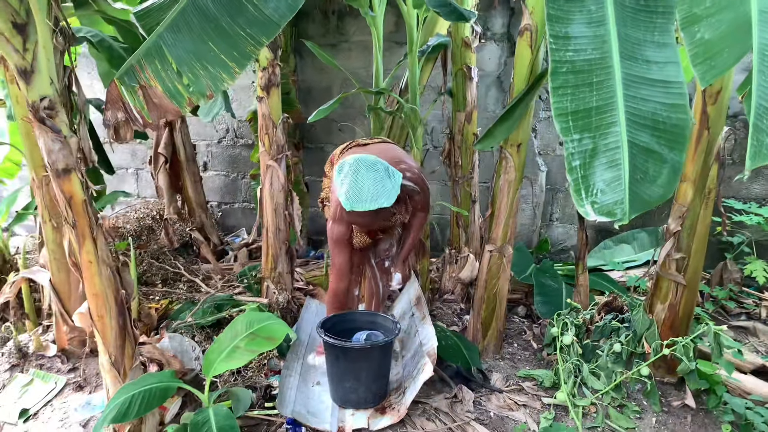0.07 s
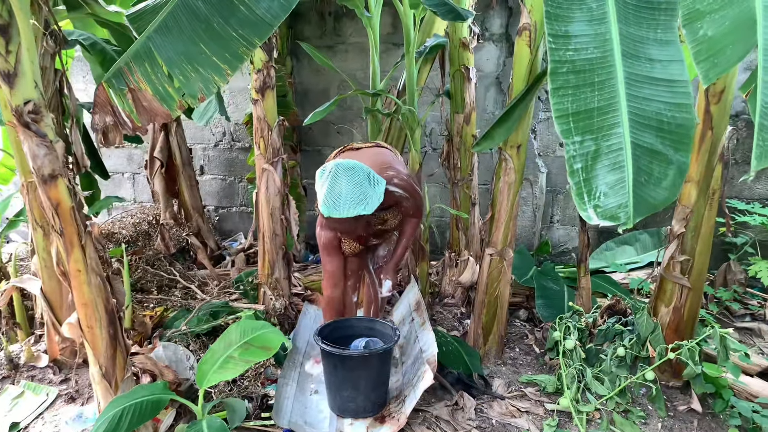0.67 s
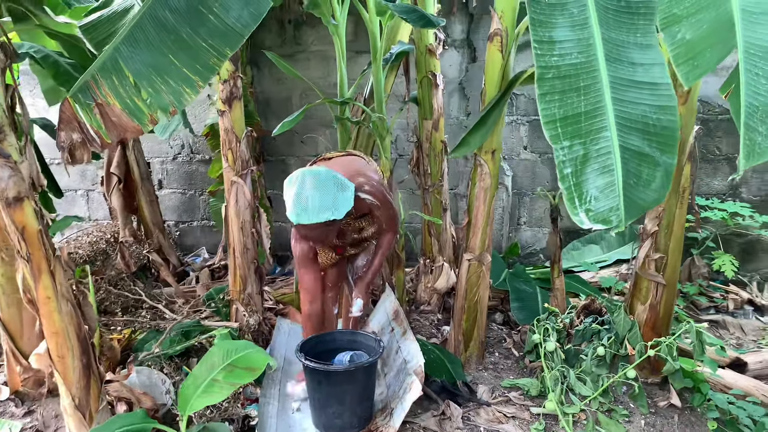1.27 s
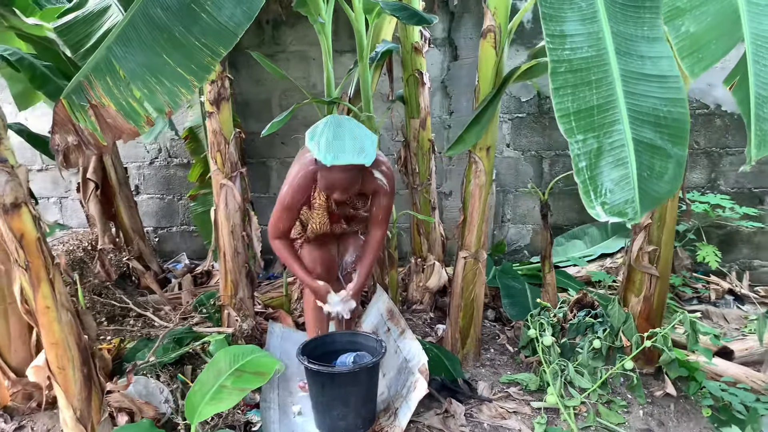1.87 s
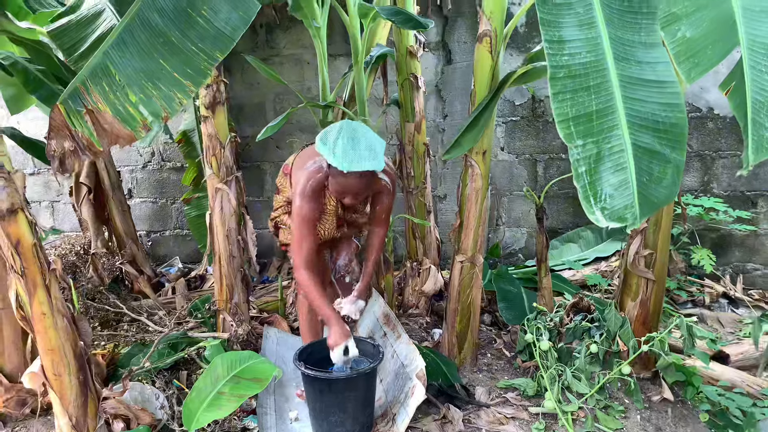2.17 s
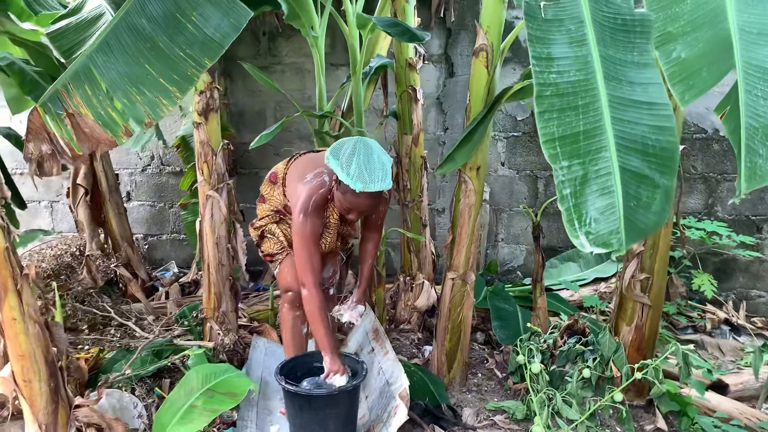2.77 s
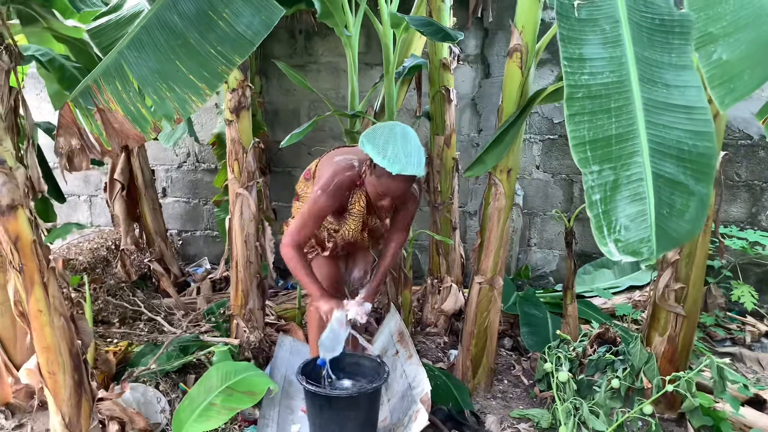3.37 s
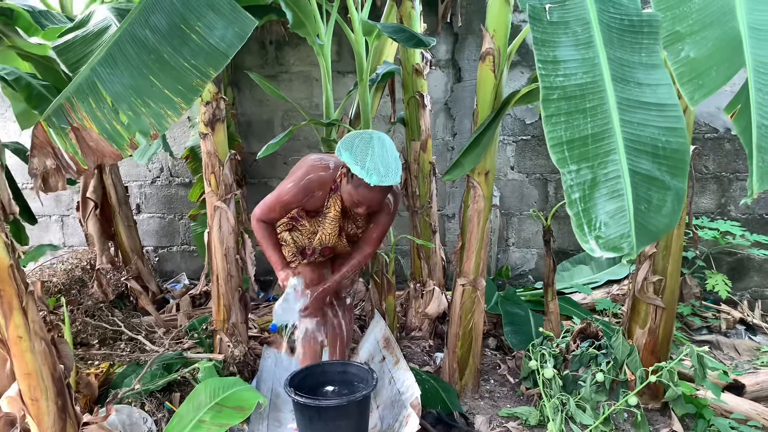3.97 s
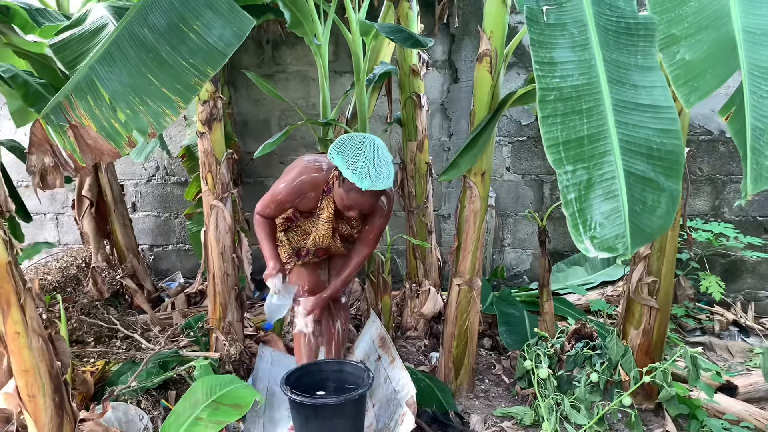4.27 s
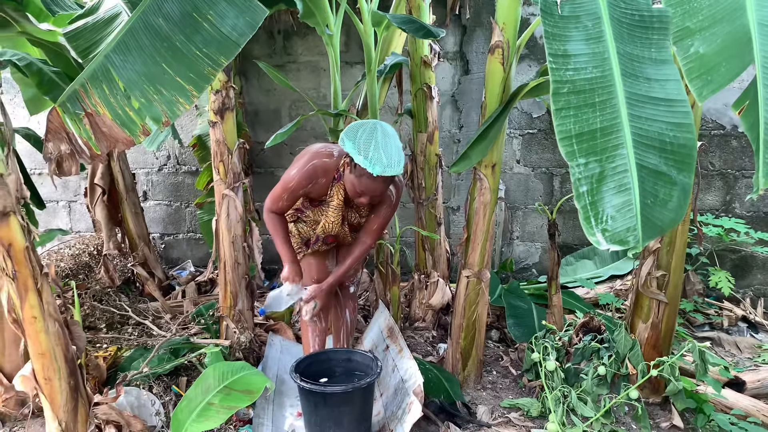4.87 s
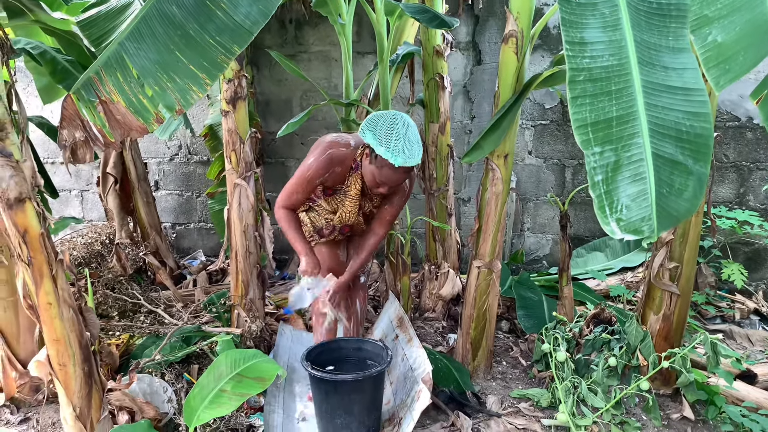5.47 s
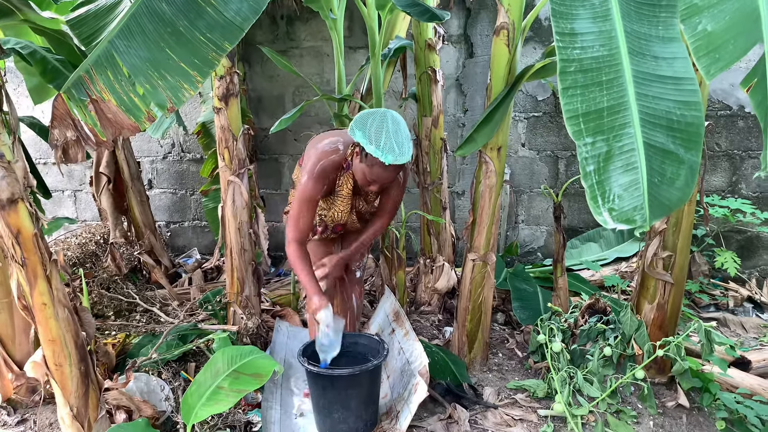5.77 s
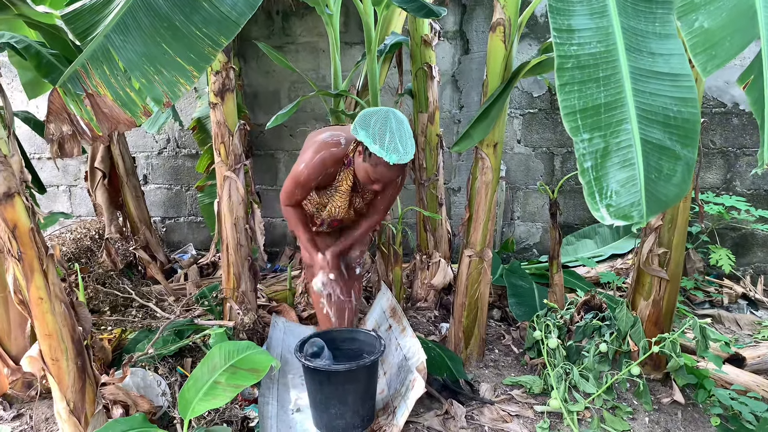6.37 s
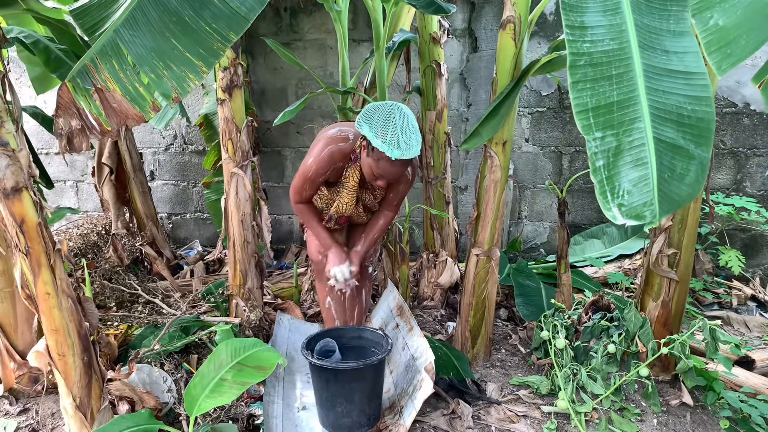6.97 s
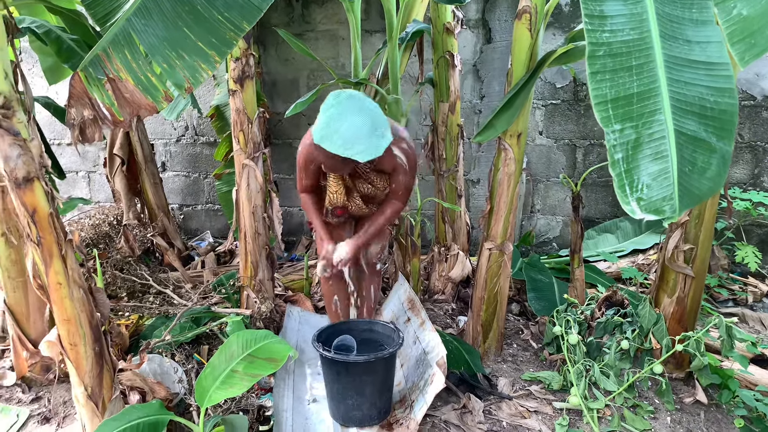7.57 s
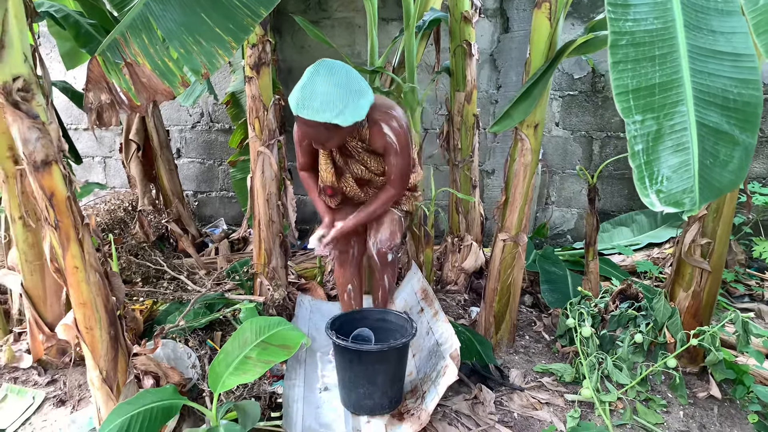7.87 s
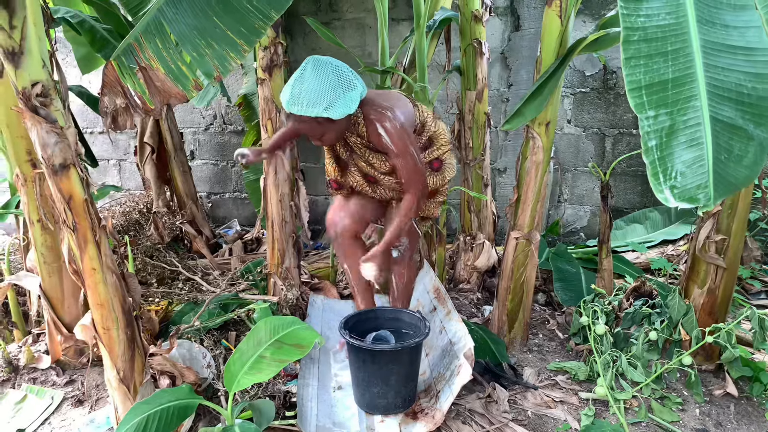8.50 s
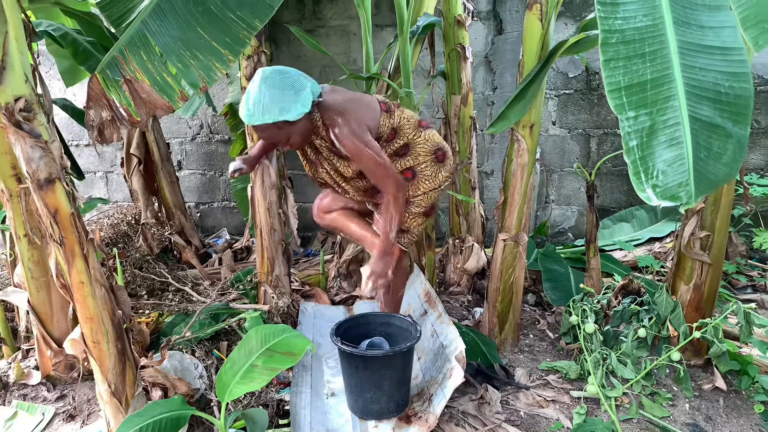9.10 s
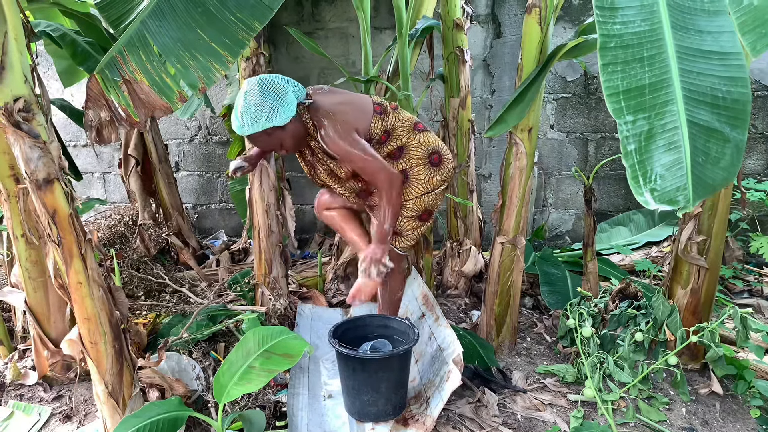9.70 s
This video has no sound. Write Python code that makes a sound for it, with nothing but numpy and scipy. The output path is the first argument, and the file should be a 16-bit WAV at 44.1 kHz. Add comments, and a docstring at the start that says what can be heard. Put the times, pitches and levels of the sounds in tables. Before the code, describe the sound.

Someone washes in a walled garden. A wet sponge rubs and squelches softly over skin with fizzing lather. Water plops in a plastic bucket, then splats and patters on a thin metal sheet underfoot. A cup knocks in the bucket. The sheet buckles with short ringing clanks, which come thickest near the end among wet smacks. The outdoor air is faint, with only a short echo.

```python
"""A wet sponge rubs and squelches over skin, its lather fizzing with each stroke, in faint outdoor air.
Someone is washing in a walled garden, standing on a thin metal sheet that grumbles, buckles and rings
under the shifting feet. Scooped water splats down and drums on the metal, a cup and drips knock and
plop at a plastic bucket, bubbles gulp, short clear tones chirp, and wet hollows smack shut.
The wall and plants give everything a short tail."""
import sys
import numpy as np
from scipy import signal
from scipy.fft import rfft, irfft, next_fast_len
from scipy.io import wavfile

SR = 44100
rng = np.random.default_rng(int(sys.argv[2]) if len(sys.argv) > 2 else 0)


def waveform_to_disk(signal):
    """Save audio, clipped to [-1, 1], as 16-bit WAV at the path in sys.argv[1]."""
    frames = np.transpose(np.atleast_2d(signal))
    scaled = np.clip(frames, -1, 1) * 32767
    samples = np.round(scaled).astype(np.int16)
    wavfile.write(sys.argv[1], SR, samples)


N = 429534
T = np.arange(N) / SR
HIT_T = T[:SR * 3 // 5]  # time axis of a one-shot

# water runs from the cup or the squeezed sponge: t/s, length/s, flow/dB, foam/dB, drumming/dB
POURS = [(3.52, 0.2, -70, -63, -62), (4.055, 0.33, -57.5, -45.5, -50), (5.49, 0.26, -61.5, -55, -55.5),
         (5.63, 0.047, -54, -45, -51), (7.35, 0.39, -61.5, -61, -64), (7.62, 0.26, -61.5, -57, -59),
         (7.93, 0.27, -62.5, -63.5, -62.5), (8.33, 0.07, -58, -57.5, -49.5)]


def undb(db):
    """Decibels to gain."""
    return 10 ** (np.asarray(db) / 20)


def unit(x):
    """Scale to an rms of one."""
    return x / np.sqrt(np.mean(x ** 2) + 1e-24)


def unit_energy(x):
    """Scale to an energy of one."""
    return x / np.sqrt(np.sum(x ** 2) + 1e-24)


def at(points, hz):
    """Read (f/Hz, value) points on a log-frequency axis."""
    f, v = np.transpose(points)
    return np.interp(np.log(np.maximum(hz, 1)), np.log(f), v)


def colour(x, points, size=4096):
    """Minimum-phase EQ through (f/Hz, level/dB) points."""
    cepstrum = irfft(np.log(undb(at(points, np.fft.rfftfreq(size, 1 / SR)))))
    cepstrum[1:size // 2] *= 2
    cepstrum[size // 2 + 1:] = 0
    response = irfft(np.exp(rfft(cepstrum)))
    return signal.fftconvolve(x, response)[:len(x)]


def bands(x, count=18):
    """Split a sound into overlapping log-spaced bands, each with its centre in Hz."""
    centres = np.geomspace(40, 16000, count)
    size = next_fast_len(len(x))
    spectrum, f = rfft(x, size), np.fft.rfftfreq(size, 1 / SR)
    for hz, share in zip(centres, np.eye(count)):
        yield hz, irfft(spectrum * at(np.c_[centres, share], f), size)[:len(x)]


def drift(rate):
    """Random modulation with a spread near one and `rate` turning points a second."""
    knots = rng.standard_normal(1000)
    return np.interp(T * rate, np.arange(len(knots)), knots)


def flicker(x, depth_db, rate):
    """Narrow bands swell and sink on their own, so that resonances come and go."""
    return unit(sum(band * undb(depth_db * drift(rate)) for _, band in bands(x, count=36)))


def add(out, s, sound):
    """Mix a sound in at time s."""
    start = max(int(s * SR), 0)
    part = sound[:max(N - start, 0)]
    out[start:start + len(part)] += part


def fade(t60):
    """Exponential decay that loses 60 dB in t60 seconds."""
    return np.exp(-np.log(1000) * HIT_T / t60)


def rise(seconds):
    """Exponential attack with the given time constant."""
    return 1 - np.exp(-HIT_T / seconds)


def ring(modes):
    """Decaying sines (f/Hz, level/dB, t60/s), a little different at every point of contact."""
    chance = rng.standard_normal((len(modes), 3)) * [2.5, .008, 1]
    out = np.zeros(len(HIT_T))
    for (hz, db, t60), (louder, detune, polarity) in zip(modes, chance):
        tone = np.sign(polarity) * np.sin(2 * np.pi * hz * (1 + detune) * HIT_T)
        out += undb(db + louder) * tone * fade(t60)
    return out


def tail(t60s, build_cycles=0.43):
    """Dense decay of unit energy from (f/Hz, t60/s) points; the lows build up late."""
    noise = rng.standard_normal(len(HIT_T))
    decays = (band * fade(at(t60s, hz)) * rise(build_cycles / hz) for hz, band in bands(noise))
    return unit_energy(sum(decays))


def level_hit(x, db, band_hz, size=1024):
    """Set the level of a hit's first samples within a band."""
    onset = signal.sosfilt(signal.butter(2, band_hz, "band", fs=SR, output="sos"), x[:size])
    return x * undb(db) / np.sqrt(np.mean(onset ** 2))


def grains(size, rate, scatter_db):
    """A stream of tiny bursts, most weak and a few strong."""
    gains = undb(scatter_db * np.minimum(rng.exponential(size=size), 5))
    return unit((rng.random(size) < rate / SR) * gains * rng.standard_normal(size))


def cavity(hz, width_hz):
    """Turbulence held in a cavity whose pitch may move."""
    pole = np.exp(-np.pi * width_hz / SR)
    noise = rng.standard_normal(len(hz)) + 1j * rng.standard_normal(len(hz))
    slow = signal.lfilter([1], np.poly([pole, pole]), noise)
    return unit(np.real(slow * np.exp(2j * np.pi * np.cumsum(hz) / SR)))


def swell(s, length, skew=0.03, steepness=1.84):
    """A bell around time s, as of a hand that speeds up and then slows a little more gently."""
    away = (T - s) / (length / 2)
    reach = np.abs(away) * (1 - skew * np.sign(away))
    return np.exp(-np.minimum(reach, 10) ** steepness)


def flow(s, length, attack_s=0.0029, release_s=0.084, sag_db_per_s=15.5):
    """Water starts quickly, weakens as the sponge or cup empties and dribbles out."""
    age = np.maximum(T - s, 0)
    attack = np.minimum(age / attack_s, 1)
    release = np.exp(-np.clip((age - length) / release_s, 0, 20))
    return attack * undb(-sag_db_per_s * age) * release


def envelope(rows, shape, db_column):
    """Power sum of gestures (t/s, length/s, ...), each at the level in one column."""
    return np.sqrt(sum((undb(row[db_column]) * shape(row[0], row[1])) ** 2 for row in rows))


def washing(rest_db, db_column):
    """Envelope of a wet sound that strokes and pours both feed, over its resting level."""
    # the sponge passes over the skin: mid-stroke t/s, length/s, rub/dB, foam/dB
    strokes = [(.03, 0.22, -68, -81), (.467, 0.19, -58, -54), (.585, 0.063, -69, -60.5),
               (.73, 0.38, -68, -68), (.83, 0.036, -70, -58), (1.058, 0.037, -68, -53.5),
               (1.16, 0.35, -73.5, -86), (1.315, 0.077, -63, -72), (1.533, 0.04, -92, -57),
               (2.27, 0.22, -60, -71), (2.92, 0.043, -69, -67), (3.15, 0.17, -70.5, -70),
               (3.34, 0.055, -65.5, -61), (3.72, 0.025, -59, -46.5), (3.97, 0.17, -61, -67.5),
               (5.4, 1, -72.5, -75.5), (6.35, 0.34, -67.5, -74), (6.69, 0.11, -63.5, -64.5),
               (6.87, 0.06, -69, -65), (7.24, 1, -69.5, -75.5), (8.97, 0.48, -68, -86.5),
               (9.16, 0.062, -61.5, -66.5), (9.23, 0.078, -61.5, -69), (9.44, 0.24, -71, -82),
               (9.735, 0.023, -53.5, -63)]
    stroking, pouring = envelope(strokes, swell, db_column), envelope(POURS, flow, db_column)
    return np.sqrt(stroking ** 2 + pouring ** 2 + undb(rest_db) ** 2)


def air(drone_db=-70.5, rumble_rest_db=-71):
    """The outdoor bed: a far, wavering drone over a low rumble that swells now and then."""
    # spectrum of the far drone: f/Hz, level/dB
    drone_eq = [(60, -6.5), (140, -4), (250, 0.5), (450, -6.5), (750, -12.5), (1500, -22), (4000, -35.5)]
    # spectrum of the rumble: f/Hz, level/dB
    rumble_eq = [(18, -25.5), (35, -6), (58, 0), (95, -2), (160, -9), (400, -37)]
    # the rumble swells: peak t/s, length/s, level/dB
    swells = [(.09, 0.22, -61.5), (2.8, 0.53, -82.5), (3.38, 0.45, -59), (3.66, 0.26, -60),
              (5.87, 0.15, -52), (8.78, 0.37, -54)]
    drone = flicker(colour(rng.standard_normal(N), drone_eq), depth_db=4, rate=10)
    rumble = unit(colour(rng.standard_normal(N), rumble_eq))
    heave = np.hypot(undb(rumble_rest_db), envelope(swells, swell, db_column=2))
    return drone * undb(drone_db) + rumble * heave


def rubbing(gain_db=4.0, grip_db=1.8, pocket_hz=1900, pocket_db=-10):
    """The sponge grips and slips on wet skin; the hollow under the hand changes size and pitch."""
    # spectrum of sponge on skin: f/Hz, level/dB
    rub_eq = [(200, -13.5), (600, -1.5), (1200, 3.5), (2200, 3.5), (4000, 6), (7000, -6.5), (9500, -4.5),
              (14000, -36)]
    slips = grains(N, rate=2200, scatter_db=3.4) + .4 * rng.standard_normal(N)
    friction = flicker(colour(slips, rub_eq), depth_db=3, rate=24)
    pocket = cavity(pocket_hz * 2 ** (.6 * drift(11)), width_hz=900)
    grip = undb(gain_db + grip_db * drift(35))
    return (friction + undb(pocket_db) * pocket) * washing(rest_db=-80, db_column=2) * grip


def foam(gain_db=0.15):
    """Foam cells and fine droplets burst in uneven clusters over a thin hiss."""
    # spectrum of the fizz: f/Hz, level/dB
    fizz_eq = [(5000, -17.5), (8500, -10.5), (11000, -11), (13500, -17), (16000, -21.5)]
    pops = grains(N, rate=2000, scatter_db=3.2) + .35 * rng.standard_normal(N)
    clusters = undb(2.2 * drift(70))
    fizz = unit(colour(pops * clusters, fizz_eq))
    return fizz * washing(rest_db=-86, db_column=3) * undb(gain_db)


def squelches():
    """A wet pocket opens or closes, so its resonance glides while it swells and fades."""
    # air and water gurgle through the sponge: t/s, length/s, level/dB, start f/Hz, end f/Hz
    gurgles = [(0.304, 0.06, -56, 430, 370), (0.524, 0.19, -65, 611, 540), (1.052, 0.11, -63.5, 740, 656),
               (2.274, 0.158, -53, 567, 489), (2.88, 0.22, -65.5, 820, 600),
               (3.472, 0.092, -59.5, 600, 530)]
    out = np.zeros(N)
    for s, length, db, first_hz, last_hz in gurgles:
        progress = np.minimum(HIT_T / length, 1)
        hz = first_hz * (last_hz / first_hz) ** progress
        add(out, s, cavity(hz, width_hz=220) * np.sin(np.pi * progress) * undb(db))
    return out


def drumming():
    """The sheet answers shifting weight and falling water with a dull, hollow patter."""
    # the weight shifts on the sheet: peak t/s, length/s, level/dB
    grumbles = [(.82, 0.8, -75), (2.95, 0.24, -61.5), (3.45, 0.29, -67), (5.36, 1, -60.5),
                (6.74, 0.36, -66), (7.3, 0.39, -62), (8.93, 0.33, -63.5), (9.7, 0.11, -59)]
    # dull spectrum of the sheet: f/Hz, level/dB
    hollow_eq = [(60, -17.5), (140, 1), (250, 2.5), (450, -3.5), (750, -3), (1500, -19.5), (4000, -48)]
    taps = grains(N, rate=900, scatter_db=2.5)
    patter = flicker(colour(taps, hollow_eq), depth_db=5, rate=18)
    return patter * np.hypot(envelope(POURS, flow, db_column=4), envelope(grumbles, swell, db_column=2))


def buckling(ring_db=-1.0, modes_db=-12, patch_db=-11, patch_t60=0.054, lead_in_db=-15):
    """A tick and a crack ring the buckling patch and the whole sheet; less snap is slower and duller."""
    # the sheet buckles under a foot: t/s, body/dB, thump/dB, snap/dB, patch f/Hz
    buckles = [(2.096, -38.5, -3.5, -20, 530), (2.529, -43.5, -6, -6, 607), (2.597, -54, -8.5, -51, 960),
               (3.798, -38.5, -25, -12, 1016), (5.034, -42, 6, -51, 314), (5.118, -32.5, -2, -10.5, 810),
               (5.149, -29, -6, -8.5, 456), (5.167, -30.5, -36.5, -9.5, 1120), (6.367, -56, 11, -3, 407),
               (6.398, -44.5, -10.5, -25, 918), (6.549, -35, -7, -24.5, 1004), (6.655, -39, -2, -32, 501),
               (7.377, -36, -9, -5, 1027), (7.656, -36, -1.5, -8.5, 2040), (7.711, -30, -10, -9.5, 1536),
               (7.798, -42, 2, -52, 430), (7.984, -33, -2, -11, 910), (8.139, -30.5, -8, -13, 933),
               (8.175, -27.5, -4, -1.5, 1840), (8.274, -43.5, 3.5, -34.5, 655),
               (8.376, -42, -6, -19.5, 914), (8.416, -36.5, -0.5, -2.5, 1206), (8.46, -41, -9, -36.5, 642),
               (8.481, -36.5, -3, -22, 315), (8.516, -47, 10.5, -33, 338), (8.554, -26, -11, -1.6, 1180),
               (8.661, -52.5, 5.5, -18, 360), (8.723, -20.5, -13, -0.8, 1540)]
    # modes of the sheet, damped by feet and soil: f/Hz, level/dB, t60/s
    sheet_modes = [(95, -8, 0.5), (271.1, -6, 0.29), (342, -3, 0.49), (471.7, -11, 0.41), (613, -3, 0.26),
                   (744, -0.5, 0.19), (1086, 5.5, 0.15), (1238, 3.5, 0.17), (1461, -3, 0.18),
                   (1537, 7.5, 0.12), (1721, 4, 0.14), (2530, 12.5, 0.16)]
    # dense ring of the sheet: f/Hz, t60/s
    ring_decay = [(80, 0.47), (250, 0.32), (600, 0.23), (1500, 0.21), (4000, 0.16), (16000, 0.1)]
    tick_eq = [(300, -17.0), (1600, 0.5), (5000, -12.5), (16000, -19.5)]
    low_cut = signal.butter(2, 170, "high", fs=SR, output="sos")  # the lows come late, through the ring
    out, lead = np.zeros(N), 600  # samples of a faint swell of noise just before each hit
    for s, body_db, thump_db, snap_db, hz in buckles:
        crack = unit_energy(grains(len(HIT_T), rate=15000, scatter_db=1) * fade(0.05))
        patch = unit_energy(ring([(hz, 0, patch_t60), (1.1 * hz, -4, patch_t60)]))
        wash = tail(ring_decay, build_cycles=0.65)
        modes = unit_energy(ring(sheet_modes))
        tick = unit_energy(colour(rng.standard_normal(len(HIT_T)) * fade(0.026), tick_eq))
        blow = signal.sosfilt(low_cut, crack) + undb(snap_db / 2 - 2) * tick
        blow += undb(ring_db) * wash + undb(modes_db) * modes + undb(patch_db) * patch
        blow *= rise(.0018 * max(1 - undb(snap_db), .1))
        lead_in = undb(lead_in_db) * np.std(blow[:lead]) * rng.standard_normal(lead)
        lead_in *= np.linspace(0, 1, lead) ** 2
        low, high = thump_db + 8, snap_db - 1.5
        bass = low + 1.27 * (body_db + 31)  # hard blows move more of the sheet
        eq = [(30, low - 38), (85, bass - 7), (220, low), (550, 4.0), (1800, -2.2), (4200, high),
              (7000, 2.43 * high - 1.5), (12000, 3 * high - 6), (16000, 2.6 * high - 23)]
        hit = colour(np.r_[lead_in, blow], eq)
        add(out, s - lead / SR, level_hit(hit, body_db - 0.3, band_hz=(400, 2500), size=lead + 1024))
    return out


def splats(gain_db=3.5, scatter_s=0.0034):
    """A slap of water breaks into droplets; heavy slaps are dull, light suds are bright."""
    # water and suds land: t/s, spray/dB, body over spray/dB
    landings = [(2.289, -52.5, 6), (2.338, -50.5, 4), (2.824, -64, 15.5), (2.921, -72, 11),
                (3.018, -64.5, 4.5), (3.723, -63, 16.5), (4.055, -42, 3), (4.321, -41, 0), (4.605, -71, 22),
                (4.892, -70, -5), (5.488, -55.5, 0.5), (5.656, -58, 16), (5.7, -53.5, -10.5),
                (5.938, -50, 2.5), (6.051, -64.5, -6), (6.952, -68, 8.5), (7.348, -58.5, -2),
                (7.549, -54.5, 5.5), (7.892, -58, 2), (8.14, -59.5, -11)]
    out = np.zeros(N)
    burst = np.exp(-HIT_T / scatter_s) * rise(0.0018)
    for s, spray_db, body_db in landings:
        drops = grains(len(HIT_T), rate=5000, scatter_db=4.3) * burst
        eq = [(50, body_db - 22), (250, body_db - 7), (600, body_db), (1700, body_db - 1.5),
              (4200, 0.24), (11000, -3 - 1.65 * body_db), (16000, -11 - 1.5 * body_db)]
        add(out, s, level_hit(colour(drops, eq), spray_db + gain_db, band_hz=(2500, 7000)))
    return out


def bucket(splash_db=-17, soften=0.52):
    """A hollow knock or plop with a wet tick; gentle ones have weaker overtones and more splash."""
    # knocks and plops of the cup and of drips at the bucket: t/s, level/dB, f/Hz
    knocks = [(2.292, -41.5, 940), (2.338, -45, 926), (2.596, -39.5, 902), (3.017, -51.5, 900),
              (3.118, -56, 887), (4.559, -53, 760), (4.605, -49, 810), (4.618, -51.5, 920),
              (4.913, -48.5, 936), (5.936, -27.5, 867), (5.974, -42, 843), (5.986, -36.5, 914)]
    # hollow modes, quickly damped by the water: ratio to the pitch, level/dB, t60/s
    hollow_modes = [(.79, 11, 0.044), (1, 14.5, 0.045), (1.8, -5, 0.056), (2.85, 1.5, 0.062),
                    (3.25, -1.5, 0.06)]
    splash_eq = [(250, -45.5), (800, 9.0), (3000, -4), (7000, -19), (16000, -33.5)]
    out = np.zeros(N)
    hardest_db = max(db for _, db, _ in knocks)
    for s, db, hz in knocks:
        tilt_db = soften * (db - hardest_db)
        modes = [(hz * k, mode_db + tilt_db * abs(np.log2(k)), t60) for k, mode_db, t60 in hollow_modes]
        hollow = unit_energy(ring(modes))
        splash = unit_energy(colour(rng.standard_normal(len(HIT_T)) * fade(0.07), splash_eq))
        knock = (hollow + undb(splash_db - tilt_db) * splash) * rise(0.0018)
        onset_rms = np.sqrt(np.mean(knock[:256] ** 2))
        add(out, s, knock * undb(db) / onset_rms)
    return out


def bubble(hz, cycles, glide):
    """Trapped air swells, rings and slides a little in pitch."""
    age = HIT_T[:4096] * hz / cycles
    phase = 2 * np.pi * hz * np.cumsum(1 + glide * np.minimum(age, 3)) / SR
    return np.sin(phase) * np.exp(-age) * (1 - np.exp(-6 * age))


def bubbles(count=1500, low_hz=500, high_hz=6500, small_db=1, pour_db=-1, gulp_db=5, gulp_s=.014):
    """Small bubbles bend up in stirred or poured water; a few larger air pockets gulp downwards."""
    # single air pockets gulp: t/s, level/dB, f/Hz
    pockets = [(2.498, -50, 483), (2.83, -57, 415), (3.035, -47, 240), (3.301, -51.5, 327)]
    # hand and cup stir the water in the bucket: t/s, length/s, level/dB
    stirs = [(2.95, 0.6, -68.5), (3.52, 0.36, -67.5)]
    small, gulps = np.zeros(N), np.zeros(N)
    for when, fine, loud in rng.random((count, 3)):
        blip = bubble(low_hz * (high_hz / low_hz) ** fine, cycles=4 + 11 * fine, glide=.06)
        add(small, when * N / SR, blip * undb(14 * loud ** 2 + 4 * fine))
    for s, db, hz in pockets:
        add(gulps, s, bubble(hz, cycles=gulp_s * hz, glide=-0.033) * undb(db + gulp_db))
    churn = envelope(stirs, flow, db_column=2) + undb(pour_db) * envelope(POURS, flow, db_column=2)
    return unit(small) * churn * undb(small_db) + gulps


def clear_tones(waver=.028):
    """Short, clear gliding tones and one longer low ring of the metal sheet swell, tremble and fade."""
    # gliding tones, the last being the sheet's ring: t/s, length/s, level/dB, start f/Hz, end f/Hz
    glides = [(2.796, .03, -65, 4360, 4200), (3.167, 0.028, -60, 2670, 2980),
              (3.21, 0.023, -63, 5600, 5800), (3.322, 0.04, -59, 3900, 4300),
              (3.415, 0.021, -64, 4200, 3960), (3.453, .035, -62.5, 5000, 5400),
              (3.54, .075, -55.5, 725, 733), (3.597, 0.052, -60, 3300, 1940),
              (3.668, 0.045, -57, 2050, 2880), (5.227, 0.15, -47.5, 361, 381)]
    out = np.zeros(N)
    for s, length, db, first_hz, last_hz in glides:
        progress = np.minimum(HIT_T / length, 1)
        tremble = 1 + waver * drift(400)[:len(HIT_T)]
        hz = first_hz * (last_hz / first_hz) ** progress * tremble
        tone = np.sin(2 * np.pi * np.cumsum(hz) / SR)
        add(out, s, tone * np.sin(np.pi * progress) * undb(db))
    return out


def smacks(t60=.075):
    """A wet hollow under the sole or the hand smacks shut with one short, broad resonance."""
    # hollows close: t/s, level/dB, f/Hz
    closings = [(5.61, -38.5, 3440), (7.377, -36, 3375), (7.548, -37.5, 3130), (7.657, -34.5, 2635),
                (7.715, -38, 2490), (7.973, -32.5, 1314)]
    out = np.zeros(N)
    for s, db, hz in closings:
        add(out, s, cavity(np.full(len(HIT_T), hz), width_hz=1300) * fade(t60) * undb(db))
    return out


def garden(x, wet_db):
    """The direct sound, then scattered stereo echoes from the wall and plants."""
    # decay of the reflections: f/Hz, t60/s
    garden_decay = [(80, 0.19), (600, 0.36), (4000, 0.18), (16000, 0.2)]
    # width of the reflections: f/Hz, side over mid/dB
    side_eq = [(60, -8), (250, -4), (600, 0.5), (1500, 4), (4000, 8), (7000, 4.5), (10000, -26.5),
               (16000, -16)]
    mid, side = tail(garden_decay), colour(tail(garden_decay), side_eq)
    fade_in = 1 - np.exp(-(HIT_T / 0.00058) ** 2)
    response = undb(wet_db) * np.array([mid + side, mid - side]) * fade_in
    response[:, 0] += 1  # the direct path
    return signal.fftconvolve(x[None], response, axes=-1)[:, :N] / np.hypot(1, undb(wet_db))


def wandering(x, wet_db):
    """A source wanders between two spots in the garden, so that its reflections keep changing."""
    share = (1 + np.sin(2 * drift(4))) / 2
    return garden(x * share, wet_db) + garden(x * (1 - share), wet_db)


def scene():
    """Everything at the washing place, over the outdoor air."""
    feet = garden(buckling() + smacks(), wet_db=-11.5)
    water = wandering(splats() + bubbles() + drumming(), wet_db=-1.0)
    sponge_and_tones = wandering(rubbing() + squelches() + clear_tones(), wet_db=-9)
    knocks = garden(bucket(), wet_db=-15)
    lather = garden(foam(), wet_db=-7.0)
    return feet + water + sponge_and_tones + knocks + lather + garden(air(), wet_db=0.5)


def record(dry):
    """Left and right get their own phase and colour, then a steep cut above 16 kHz."""
    # phase between the two microphone ports: f/Hz, left lead/rad
    port_phase = [(0, 0), (1000, .15), (2000, .8), (3200, 2.1), (4800, 1.9), (6000, 0), (7300, -1.2),
                  (8600, -3.14), (10500, -6.1), (11500, -6.4), (13400, -9.42), (15000, -12.4),
                  (16500, -12.6)]
    balance_eq = [(100, -0.5), (250, -1.0), (600, 2.0), (1200, 2.0), (2500, 0.4), (4800, -3.5), (7500, 0)]
    size = next_fast_len(N + 4096)
    f = np.fft.rfftfreq(size, 1 / SR)
    lead = np.interp(f, *np.transpose(port_phase))
    split = np.array([[.5], [-.5]])  # half to the left, the opposite half to the right
    ports = np.exp(1j * split * lead) * undb(split * at(balance_eq, f))
    sound = irfft(rfft(dry, size) * ports, size)[:, :N]
    return signal.sosfilt(signal.ellip(8, .2, 70, 16000, fs=SR, output="sos"), sound)


dry = scene()
out = record(dry)
waveform_to_disk(out)
```